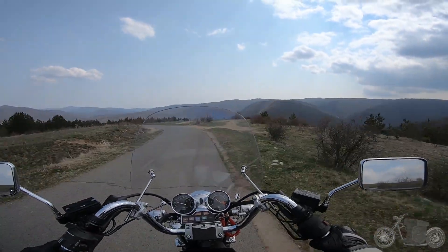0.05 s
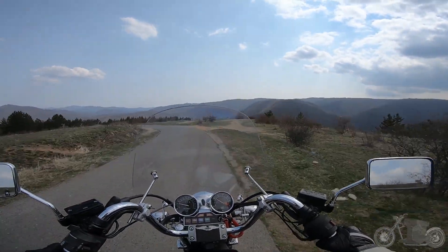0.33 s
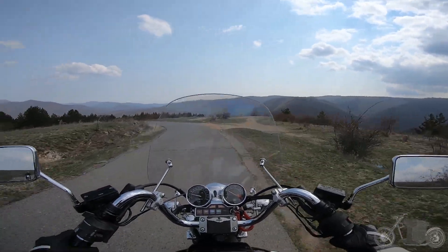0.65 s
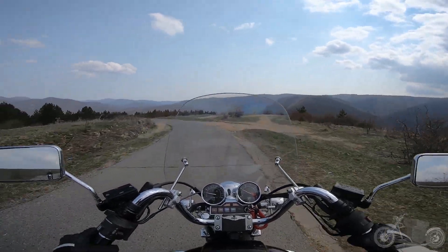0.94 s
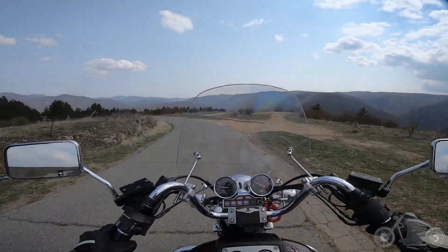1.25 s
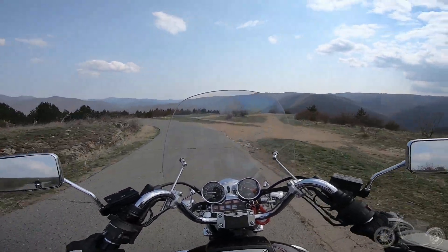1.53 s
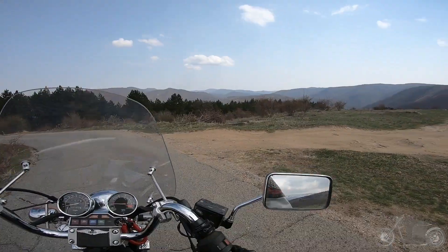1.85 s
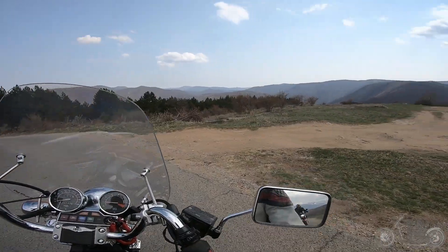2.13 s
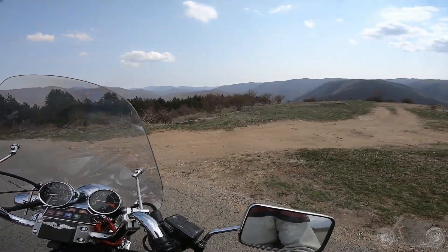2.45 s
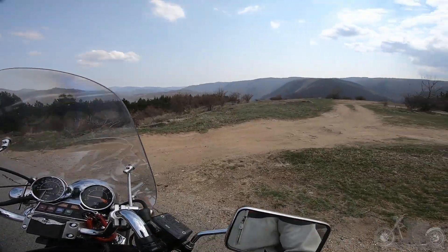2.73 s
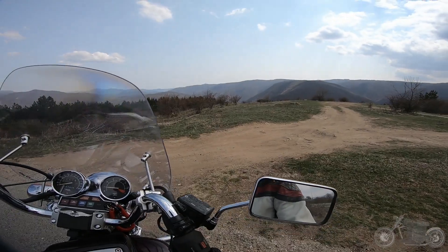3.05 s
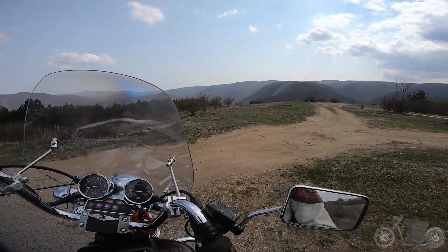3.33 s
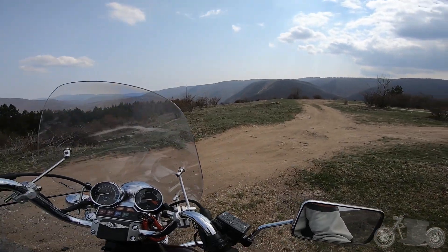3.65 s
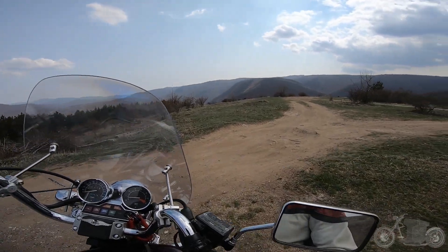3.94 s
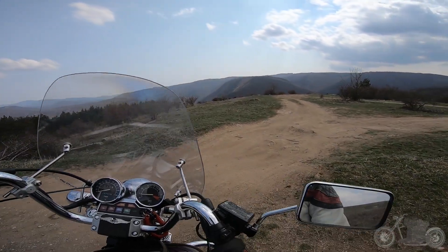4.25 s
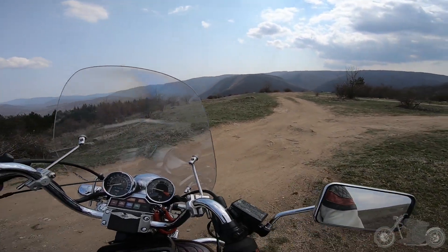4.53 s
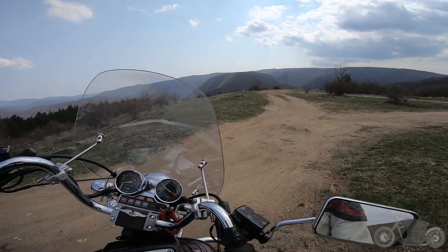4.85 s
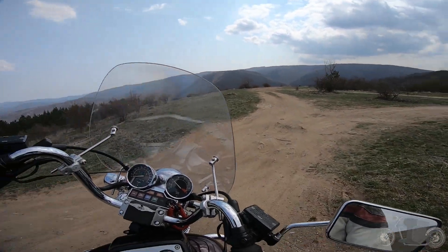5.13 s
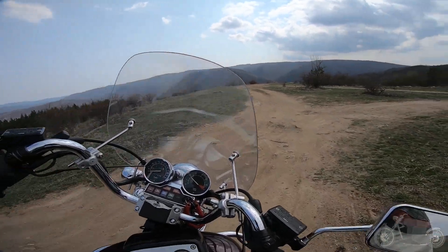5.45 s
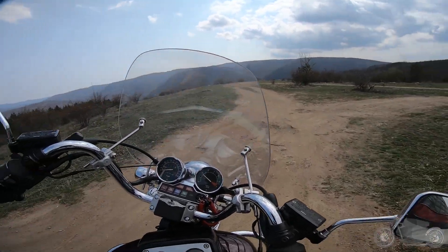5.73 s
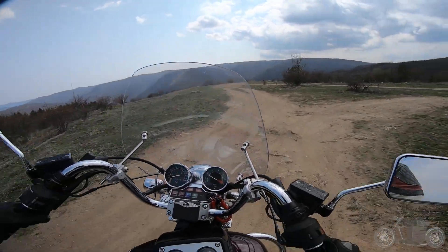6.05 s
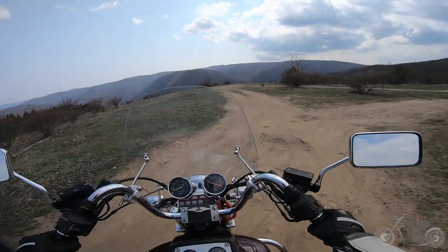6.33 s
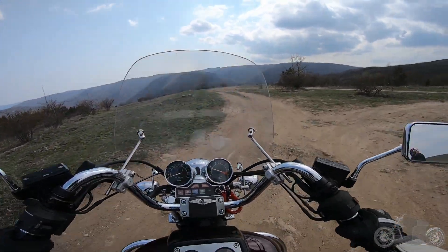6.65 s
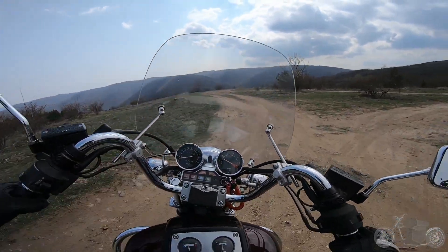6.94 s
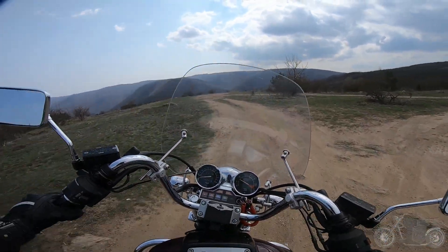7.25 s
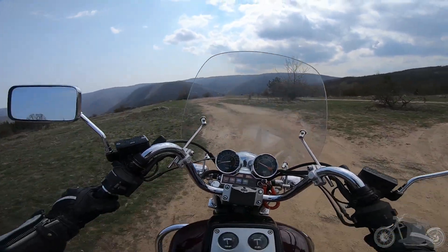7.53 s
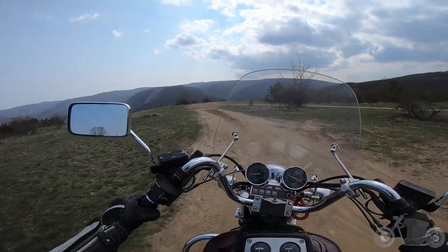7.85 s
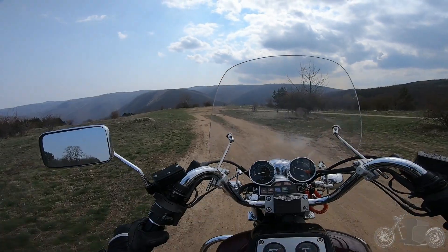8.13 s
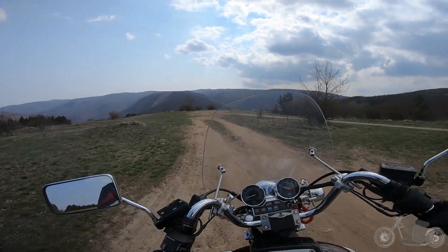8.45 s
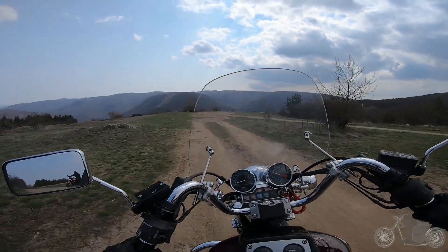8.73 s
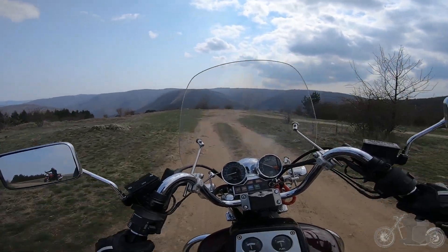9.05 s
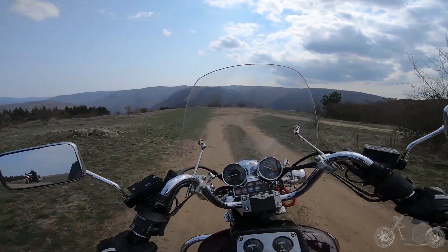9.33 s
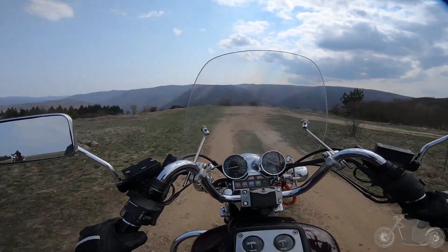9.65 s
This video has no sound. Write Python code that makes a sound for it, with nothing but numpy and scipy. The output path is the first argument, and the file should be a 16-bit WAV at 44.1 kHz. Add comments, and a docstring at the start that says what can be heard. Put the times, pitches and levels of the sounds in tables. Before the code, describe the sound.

A V-twin motorcycle coasts, cuts to a thumping idle, then pulls away onto dirt with gear whine and wind.

```python
"""A V-twin motorcycle coasts in gear; the sound cuts abruptly to it idling, then it pulls away onto
a dirt track. Paired pressure pulses excite its exhaust pipe; the airbox resonates, gears whine at
multiples of the crank speed, and valves and slack parts strike the case. Tyres rush, a low drone
glides upward, bumps thud and the gear clunks as it engages. At two microphones on the rider, wind
buffets, a strap creaks by stick-slip friction and taps ring the housing."""
import sys
import numpy as np
from scipy import signal
from scipy.fft import rfft, irfft
from scipy.io import wavfile
from scipy.ndimage import uniform_filter1d

SR = 44100
rng = np.random.default_rng(int(sys.argv[2]) if len(sys.argv) > 2 else 0)


def wrap_up_sound(samples):
    """Save the sound to the file named by the first command line argument, as 16-bit audio."""
    columns = np.atleast_2d(samples).T
    # keep every value between -1 and 1, then stretch to whole-number steps
    tamed = np.clip(columns, -1, 1)
    steps = np.round(tamed * 32767).astype(np.int16)
    wavfile.write(sys.argv[1], SR, steps)


N = 432180
TIME = np.arange(N) / SR
FREQ = np.maximum(np.fft.rfftfreq(N, 1 / SR), 1)
COAST_END_S = 1.81  # the sound cuts from coasting to idling

# Engine speed, two crank revolutions to a cycle: (time [s], cycle rate [Hz])
CYCLE_RATE = [(0.0, 18.502), (1.396, 13.29), (1.797, 12.277), (1.807, 7.964), (2.446, 9.425),
              (2.696, 7.907), (3.186, 7.846), (3.646, 7.026), (4.096, 6.787), (4.266, 8.056),
              (4.436, 13.077), (4.696, 16.343), (4.926, 16.732), (5.516, 14.923), (6.796, 12.547),
              (7.316, 13.336), (7.676, 12.432), (7.966, 14.888), (8.426, 15.11), (9.8, 16.092)]
# Throttle position: (time [s], opening [0-1])
THROTTLE = [(0, 0.3), (1.75, 0.2), (1.85, .2), (2.45, .2), (2.7, 0.09), (4.15, .03), (4.45, 0.87),
            (6.1, 0.88), (6.6, .62), (7.55, .68), (7.9, 0.9), (9.8, 0.99)]
def riding_db(base_db, doubling_db, opening_db, coast_db, at=TIME, cruise_hz=15):
    """Level law: decibels vary linearly with octaves of speed and with throttle, plus a coasting term."""
    octaves = np.log2(curve(CYCLE_RATE, at) / cruise_hz)
    opening = curve(THROTTLE, at) - .5
    return base_db + doubling_db * octaves + opening_db * opening + coast_db * (at < COAST_END_S)


# Spectrum of one exhaust pulse, throttle open and shut: (frequency [Hz], relative level [dB])
OPEN_PULSE = [(5, -55), (20, -30.5), (35, -28.5), (55, 1), (92, 5.5), (130, -2.5), (170, -6.5),
              (215, -17.5), (300, -25), (450, -41.5), (800, -49), (2000, -97)]
SHUT_PULSE = [(5, -44), (20, -31.5), (35, -15), (55, 7.5), (90, -2), (135, -0.5), (165, -12.5), (200, -25),
              (280, -33), (450, -45), (800, -58), (2000, -99)]
# Acoustic shadow at the left microphone: (frequency [Hz], left minus right [dB])
EXHAUST_SHADOW = [(30, -31), (60, -12), (93, -9.5), (140, -8), (220, -3), (340, -4), (800, -13.5)]
def exhaust(cycles, gain_db=-8.5, vee_gap=.305, round_trip_s=.01492, reflection=.27, left_lag_rad=1.1):
    """Pulse excitation of a pipe: two unevenly spaced firings a cycle echo in it, losing treble."""
    whole_cycles = np.arange(np.ceil(cycles[0]), cycles[-1])
    front, rear = (0, 0, -7, 4.5), (vee_gap, -1, 0, -2.5)
    opened = shut = 0
    for offset, open_db, shut_db, coast_db in (front, rear):
        times = np.interp(whole_cycles + offset, cycles, TIME)
        throttle, coasting = curve(THROTTLE, times), times < COAST_END_S
        db = riding_db(-.65, doubling_db=2.2, opening_db=2.3, coast_db=coast_db - 1.9, at=times)
        scatter_db = 2 * (1 - throttle) + .2 * throttle + .5 * coasting
        loud, late = rng.standard_normal((len(times), 2)).T
        size = undb(db + scatter_db * loud) * (times < TIME[-1])
        times = times + .0005 * scatter_db * late  # poor burns also come early or late
        opened = opened + impulses(times, size * throttle * undb(open_db))
        shut = shut + impulses(times, size * (1 - throttle) * undb(shut_db))
    sharp, soft = minimum_phase(OPEN_PULSE), minimum_phase(SHUT_PULSE)
    pulses = (rfft(opened) * sharp + rfft(shut) * soft) / np.abs(irfft(sharp, N)).max()
    echo = reflection * np.exp(-2j * np.pi * FREQ * round_trip_s) * lowpass(250, 2)
    right = pulses / (1 - echo)
    left = right * undb(spectrum(EXHAUST_SHADOW)) * np.exp(-1j * left_lag_rad)
    return undb(gain_db) * irfft([left, right], N)


def intake(cycles):
    """Cavity resonance: airbox noise swells once a revolution as a cylinder draws air."""
    airbox = noise(resonance(FREQ, hz=418, half_width_hz=22), coherence=.72, pan_db=-2)
    gulps = unit(undb(1.5 * np.cos(4 * np.pi * (cycles - .22))))
    return undb(riding_db(-49, doubling_db=5.5, opening_db=4.5, coast_db=0)) * airbox * gulps


# Gear cover resonances: (frequency [Hz], bandwidth [Hz], boost [dB])
COVER_MODES = [(1026, 100, 5), (1450, 86, 5)]
def gear_whine(cycles, order, gains, backlash=.4, flutter_db=4, throb_db=1.5):
    """Modulation of a mesh tone: backlash varies its phase, the load of the firings its amplitude."""
    play = walk(55) + 1.4 * np.sin(2 * np.pi * cycles)
    phase = order * (2 * np.pi * cycles + backlash * play / 50)
    load_db = throb_db * np.cos(2 * np.pi * (cycles - .1)) + flutter_db * walk(54)
    mesh_hz = order * curve(CYCLE_RATE)
    tone = 0
    for k, gain in enumerate(gains, 1):
        boost_db = sum(db * resonance(k * mesh_hz, hz, width / 2) for hz, width, db in COVER_MODES)
        tone = tone + gain * undb(boost_db) * np.sqrt(2) * np.sin(k * phase)
    flutter = np.array([unit(undb(load_db + .98 * walk(7))) for _ in range(2)])
    return tone * flutter * pan(-4)


# Spells under load: (start [s], duration [s], gear pair, fundamental level [dB], octave level [dB])
GEAR_SPELLS = [(0, 1, "primary", -52, -69.5), (.1, .45, "coasting", -49, -49.5),
               (0.549, 1.11, "coasting", -40.5, -52.5), (1.1, 0.29, "primary", -50.5, -72),
               (1.4, 0.42, "primary", -54.5, -59), (1.794, 2.5, "primary", -59, -79),
               (4.348, 1.36, "primary", -53.5, -70), (4.9, 0.67, "high", -78.5, -99),
               (5.661, 1.66, "primary", -51.5, -74.5), (7.257, 0.24, "primary", -48.5, -78),
               (7.502, 0.41, "primary", -50.5, -68), (7.886, 1.75, "pulling", -54, -55.5),
               (8.608, 0.88, "high", -76, -99)]
def gears(cycles, fade_s=.088):
    """Tooth meshing: each loaded pair sounds at its order, the number of meshes per engine cycle."""
    out = 0
    for pair, order in dict(primary=78, coasting=24.8, pulling=35.2, high=232).items():
        gains = 0
        for start, length, name, *levels_db in GEAR_SPELLS:
            if name == pair:
                onset = start - fade_s / 2
                gate = ramp(onset, fade_s) - ramp(onset + length, fade_s)
                gains = gains + np.outer(undb(levels_db), gate)
        out = out + gear_whine(cycles, order, gains)
    return out


# Likeness of the bike's noise at the two microphones: (frequency [Hz], coherence [0-1])
COHERENCE = [(60, 1), (320, 0.78), (600, 0.7), (1000, 0.3), (1800, 0.07), (3000, 0)]
# Spectrum of rattling metal: (frequency [Hz], relative level [dB])
RATTLE_SPECTRUM = [(150, -7.5), (300, 9.5), (600, 6.5), (800, -3), (1200, -3.5), (1800, -3.5), (2200, -6.5),
                   (2650, -3.5), (3100, -10.5), (3600, -17.5), (4100, -21.5), (7000, -41), (14000, -53.5)]
# Crankcase resonances: (frequency [Hz], bandwidth [Hz], relative level [dB])
CASE_MODES = [(597, 49, 1.5), (1504, 16, -7), (2186, 230, -7.5)]
def valve_clatter(cycles, fins_gain_db=6, case_gain_db=-3, scatter_db=4.3, decay_cycles=.027):
    """Impact excitation: valves seat four times a cycle, rattling the fins and ringing the crankcase."""
    beat = np.floor(4 * cycles + 4).astype(int)
    force = undb(4 + scatter_db * rng.standard_normal(beat.max() + 1))[beat]
    decay = np.exp(-(cycles % (1 / 4)) / decay_cycles)
    ticks = unit(uniform_filter1d(1 + force * decay, size=60))
    fins = noise(undb(spectrum(RATTLE_SPECTRUM)), spectrum(COHERENCE))
    modes = sum(undb(db) / (1 + 2j * (FREQ - hz) / width) for hz, width, db in CASE_MODES)
    case = noise(np.abs(modes) * lowpass(3000, 8), coherence=.12, pan_db=1) * undb(2 * walk(21))
    effort_db = riding_db(-60.5, doubling_db=.5, opening_db=9.5, coast_db=8)
    hum_db = -54.5 + .23 * (effort_db + 63)  # the hum grows more slowly with effort than the rattle
    return ticks * (undb(effort_db + fins_gain_db) * fins + undb(hum_db + case_gain_db) * case)


# Modes of slack engine parts: (frequency [Hz], T60 [s], relative level [dB])
SLACK_MODES = [(950, 0.0068, -7), (1310, .014, -3.5), (1465, 0.015, -3)]
def knocks(cycles, scatter_db=3):
    """Impact across a clearance: parts knock once a revolution, hardest as the wheel drives the engine."""
    revolutions = np.arange(0, cycles[-1] - 1, .5)
    late, loud = rng.standard_normal((len(revolutions), 2)).T
    times = np.interp(revolutions + .3 + .09 * late, cycles, TIME)
    db = riding_db(-45, doubling_db=10.5, opening_db=-1, coast_db=6, at=times) + scatter_db * loud
    blows = ring(np.column_stack([times, db]), SLACK_MODES)
    return filtered(blows, lowpass(2400, 8)) * left_gain(-2)


# Spectrum of tyres and passing air: (frequency [Hz], relative level [dB])
TYRE_SPECTRUM = [(60, -7), (150, 13.5), (250, 6.5), (400, 6.5), (560, 3), (800, 2), (950, 0.5), (1070, 4),
                 (1200, -0.5), (1400, -2), (1750, -7), (2500, -12), (3200, -21), (4000, -39.5),
                 (8000, -52.5)]
def tyres(gain_db=6, dirt_start_s=6.42, dirt_db=4, swirl_db=1.5):
    """Broadband rolling noise: it grows with speed and on loose dirt; its two bands fluctuate apart."""
    rush = noise(undb(spectrum(TYRE_SPECTRUM)), spectrum(COHERENCE), pan_db=-4)
    low = filtered(rush, lowpass(700, 4))
    swirling = low * undb(swirl_db * walk(51)) + (rush - low) * undb(swirl_db * walk(25))
    db = riding_db(-50.5, doubling_db=10.5, opening_db=-1, coast_db=4.5)
    return undb(db + gain_db + dirt_db * ramp(dirt_start_s, .5)) * swirling


# Single gusts: (peak time [s], 1/e half-width [s], level [dB])
GUSTS = [(0.167, 0.06, -31), (2.099, 1, -45), (3.373, 0.081, -22.5), (6.901, 0.95, -28.5)]
def wind():
    """Turbulent pressure: slow gusts and quicker windscreen eddies push mostly on the right microphone."""
    gusts = noise(FREQ / (FREQ + 15) * lowpass(24, 3), coherence=.8, pan_db=-12)
    eddies = noise((1 - lowpass(45, 2)) * lowpass(110, 4), coherence=.93, pan_db=-12)
    breeze = undb(-34 + 1.4 * walk(2))
    swells = sum(undb(db) * np.exp(-((TIME - s) / half) ** 2) for s, half, db in GUSTS)
    buffet_db = riding_db(-43, doubling_db=5, opening_db=.5, coast_db=7.5) + 2 * walk(16)
    return (breeze + swells) * gusts + undb(buffet_db) * eddies


# Bumps, and a clunk as the gear engages: (time [s], thud level [dB], rattle level [dB])
THUDS = [(0.26, -15, -39), (0.357, -7.5, -28), (.851, -12, -41), (2.163, -38, -44), (4.26, -32, -39.5),
         (6.926, -52.5, -37), (7.226, -32, -46)]
def thuds(rattle_decay_s=.021):
    """Shock excitation: damped low modes thud through soft rubber, and loose fittings rattle."""
    shocks = ring(THUDS, modes=[(129, .055, .5), (182, .015, .5), (424, .03, -16)])
    thud = filtered(shocks, lowpass(600, 4))
    shake = sum(undb(db) * np.exp(-np.abs(TIME - s) / rattle_decay_s) * (TIME > s) for s, _, db in THUDS)
    fittings = unit(undb(spectrum(RATTLE_SPECTRUM)) * lowpass(3600, 4))
    rattle = filtered(shake * noise(1, coherence=.6, pan_db=-1.4), fittings)
    return thud * left_gain(-6) + rattle


# Taps on the microphone housing: (time [s], peak level [dB])
TAPS = [(2.1655, -30.5), (2.9348, -12), (2.974, -35), (7.2457, -12)]
# Modes of the housing: (frequency [Hz], T60 [s], relative level [dB])
HOUSING_MODES = [(950, 0.008, 6.5), (1590, 0.0023, 13.5), (2590, 0.0045, 10), (3770, 0.0089, -22),
                 (5400, 0.0037, -43)]
def housing_taps():
    """Free vibration: each tap rings the housing briefly, close to the right microphone."""
    return ring(TAPS, HOUSING_MODES) * left_gain(-25)


# Pulls on a strap: (start [s], duration [s], greatest slip rate [1/s], slip level [dB])
STRAP_PULLS = [(1.947, 0.8, 38, -43), (2.749, 0.017, 180, -39), (3.998, .13, 32, -40)]
# Modes of the strap: (frequency [Hz], T60 [s], relative level [dB])
STRAP_MODES = [(1130, 0.004, 10), (1340, 0.015, -21.5), (2690, 0.025, -0.5), (3020, 0.035, -2)]
def strap_creak(max_slips=40, jitter=.29, scrape_decay_s=.0074, waver_s=.00038):
    """Stick-slip friction: slips come fastest in mid-pull, and each one scrapes and rings the strap."""
    slips = []
    for start, length, rate, db in STRAP_PULLS:
        late, loud = rng.standard_normal((max_slips, 2)).T
        drawn = (np.arange(max_slips) + .5 + jitter * late) / (rate * length * 2 / np.pi)
        times = start + length * np.arccos(1 - 2 * np.clip(drawn, 0, 1)) / np.pi
        slips += list(np.column_stack([times, db - loud])[drawn < 1])
    times, levels_db = np.transpose(slips)
    pole = np.exp(-1 / (scrape_decay_s * SR))
    rub = signal.lfilter([1], [1, -pole], impulses(times, undb(levels_db - 7)))
    scrape = rub * noise(resonance(FREQ, hz=1250, half_width_hz=500), coherence=.24)
    squeak = np.interp(TIME + waver_s * walk(35), TIME, ring(slips, STRAP_MODES))  # the pitch wavers
    return (squeak + scrape) * left_gain(-9)


# Rising tones: (start [s], duration [s], first frequency [Hz], last frequency [Hz], level [dB])
GLIDES = [(5.452, 0.77, 325.3, 363.7, -45), (6.501, 0.45, 324, 374, -42.5),
          (6.925, 0.41, 351, 379.6, -43.5)]
def drone(waver=.012, flutter_db=3):
    """Frequency glide: a low, wavering sine tone swells and fades as it rises."""
    out = 0
    wobble = 1 + waver * walk(18.6)
    for start, length, first, last, db in GLIDES:
        along = ramp(start, length)
        phase = 2 * np.pi * np.cumsum((first + (last - first) * along) * wobble) / SR
        swell = np.sqrt(np.abs(np.sin(np.pi * along)))
        out = out + undb(db) * swell * np.sin(phase)
    return out * undb(flutter_db * walk(14)) * pan(-4)


# Spectrum of microphone hiss: (frequency [Hz], relative level [dB])
HISS_SPECTRUM = [(1000, 12.5), (4000, 2), (6000, 0), (9000, -1), (13000, -2.5), (16000, -4)]
def hiss():
    """Self-noise: the microphones add a faint, steady floor."""
    return undb(-66) * noise(undb(spectrum(HISS_SPECTRUM)), coherence=.13, pan_db=-1)


def undb(db):
    """Amplitude ratio of a level in decibels."""
    return 10 ** (np.asarray(db) / 20)


def unit(x):
    """Normalisation to rms 1."""
    return x / np.sqrt(np.mean(x ** 2))


def pan(db):
    """Stereo gains for a level difference, left minus right."""
    return undb([[db / 2], [-db / 2]])


def left_gain(db):
    """Stereo gains that alter the left level alone."""
    return undb([[db], [0]])


def ramp(start, length):
    """Linear rise from 0 to 1."""
    return np.clip((TIME - start) / length, 0, 1)


def curve(table, at=TIME):
    """Linear interpolation of (time [s], value)."""
    return np.interp(at, *np.transpose(table))


def spectrum(table):
    """Interpolation of (frequency [Hz], value) on a logarithmic frequency axis."""
    hz, value = np.transpose(table)
    return np.interp(np.log(FREQ), np.log(hz), value)


def lowpass(hz, order):
    """Gain that falls by 6 dB per octave per order above the corner."""
    return 1 / (1 + (FREQ / hz) ** order)


def resonance(at, hz, half_width_hz):
    """Lorentzian peak of height 1."""
    return 1 / (1 + ((at - hz) / half_width_hz) ** 2)


def filtered(x, gain):
    """Filtering by multiplication of the spectrum."""
    return irfft(rfft(x) * gain, N)


def minimum_phase(table):
    """Causal response for (frequency [Hz], level [dB]), by folding the cepstrum."""
    cepstrum = irfft(np.log(undb(spectrum(table))), N)
    cepstrum[1:N // 2] *= 2
    cepstrum[N // 2 + 1:] = 0
    return np.exp(rfft(cepstrum))


def walk(hz):
    """Band-limited random fluctuation of rms 1."""
    return unit(filtered(rng.standard_normal(N), np.exp(-np.minimum(FREQ / hz, 20) ** 2)))


def noise(gain, coherence, pan_db=0):
    """Partly coherent stereo noise of rms 1, coloured by a spectral gain."""
    mid, side = rfft(rng.standard_normal((2, N)))
    both = mid * np.sqrt(1 + coherence) + np.array([side, -side]) * np.sqrt(1 - coherence)
    return unit(irfft(both * gain * pan(pan_db), N))


def impulses(times, sizes):
    """Impulse train with the given times and amplitudes."""
    return np.bincount(np.clip(times * SR, 0, N - 1).astype(int), sizes, N)


def ring(blows, modes):
    """Modal response of (frequency [Hz], T60 [s], level [dB]) to blows of (time [s], peak level [dB])."""
    t = TIME[:SR // 5]
    body = sum((-1) ** k * undb(db - 60 * t / t60) * np.sin(2 * np.pi * hz * t)
               for k, (hz, t60, db) in enumerate(modes))
    times, peak_db = np.transpose(blows)[:2]
    return signal.fftconvolve(impulses(times, undb(peak_db)), body / np.abs(body).max())[:N]


def scene():
    """Superposition: engine sources share one crank phase, and the other sounds add to them."""
    cycles = np.cumsum(curve(CYCLE_RATE)) / SR - .494
    engine = exhaust(cycles) + intake(cycles) + gears(cycles) + valve_clatter(cycles) + knocks(cycles)
    return engine + tyres() + drone() + wind() + thuds() + housing_taps() + strap_creak() + hiss()


def record(dry, cutoff_hz=15700):
    """Band limiting: a steep low-pass filter removes the highest treble."""
    return signal.sosfilt(signal.ellip(8, .2, 70, cutoff_hz, fs=SR, output="sos"), dry)


dry = scene()
out = record(dry)
wrap_up_sound(out)
```